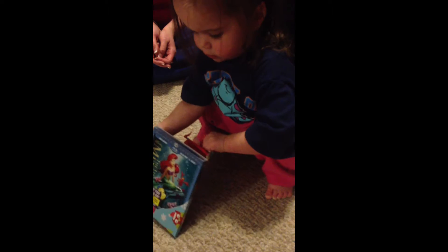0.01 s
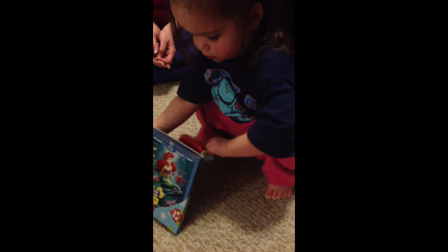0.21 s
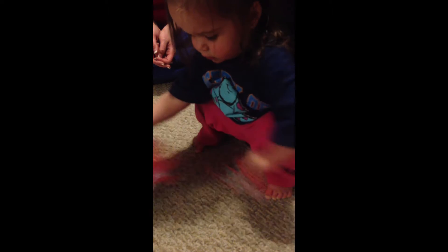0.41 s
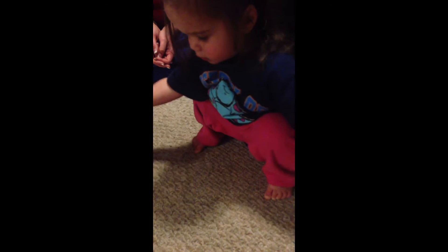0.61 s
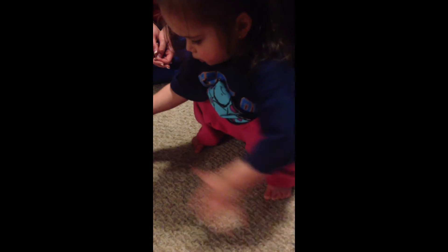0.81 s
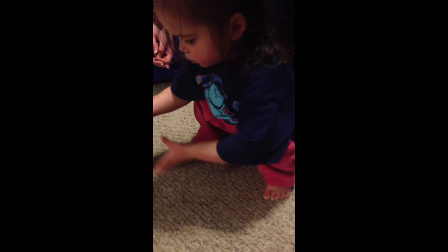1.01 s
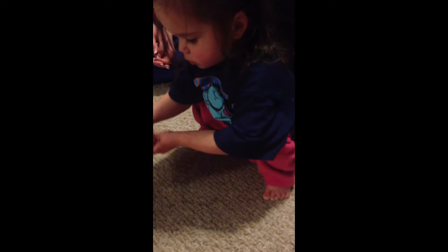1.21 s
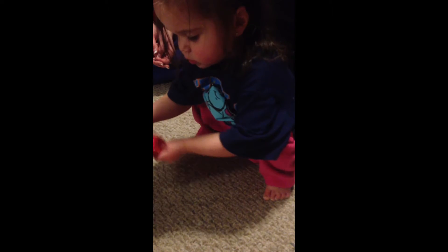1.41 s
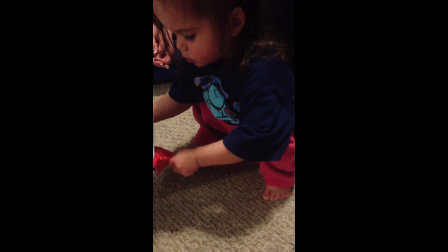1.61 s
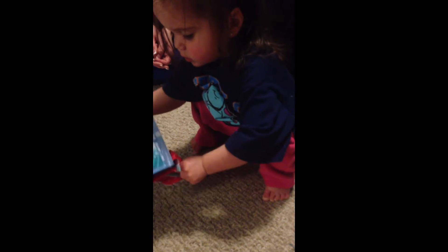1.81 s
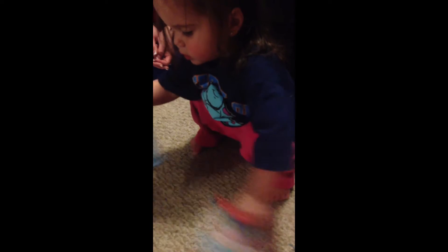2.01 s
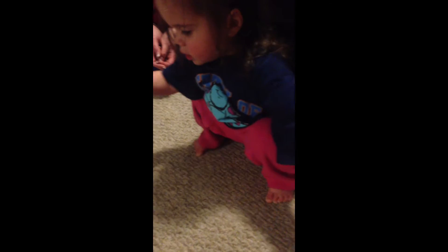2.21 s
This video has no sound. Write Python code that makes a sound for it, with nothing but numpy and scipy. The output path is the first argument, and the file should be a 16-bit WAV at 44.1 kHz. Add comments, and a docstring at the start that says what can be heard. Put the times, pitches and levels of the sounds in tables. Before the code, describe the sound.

Wrapping paper ripped from a cardboard box: one crackly tear, faint flap rustle and a near-quiet gap, small crinkles, then two close rips with dull box knocks; close microphone, soft carpeted room, faint hum.

```python
"""Wrapping paper is pulled off a boxed present: one short rip, loose crinkles, then two more rips close together.
Each pull is a rain of noise grains and louder single creases, coloured as crack, sheet and cardboard box.
Fibre hiss swells with the rips and sine knocks of the box join them; after the first rip a loose flap
rustles in narrow treble noise. Crinkles and a few dull knocks end it. Throughout, a furnished room
answers the paper with sparse reflections, over wavering hum tones and smooth room tone."""
import sys
import numpy as np
from scipy import signal
from scipy.fft import rfft, irfft
from scipy.io import wavfile
from scipy.ndimage import uniform_filter1d

SR = 44100
rng = np.random.default_rng(int(sys.argv[2]) if len(sys.argv) > 2 else 0)


def store_wav(level_fs):
    """Save 16-bit WAV to argv[1]."""
    pcm = np.round(np.clip(np.atleast_2d(level_fs), -1, 1) * 32767)
    wavfile.write(sys.argv[1], SR, pcm.T.astype(np.int16))


def undo_db(level):
    """Turn decibels back into plain size, where 20 dB means ten times bigger."""
    steps = np.asarray(level, float) / 20
    return 10 ** steps


N = 99225  # length in samples, 2.25 s


def evened(x):
    """Scales to rms 1."""
    return x / np.sqrt(np.mean(x ** 2) + 1e-20)


def read(points, hz):
    """Reads a table of (Hz, value) on a log-frequency axis."""
    table_hz, value = np.transpose(points)
    return np.interp(np.log(hz + 1), np.log(table_hz + 1), value)


def band_noise(low_hz, high_hz, order, noise):
    """Keeps one band of the noise."""
    band = signal.butter(order, [low_hz, high_hz], "band", fs=SR, output="sos")
    return signal.sosfilt(band, noise)


def colour(points):
    """Minimum-phase filter of unit energy with this spectrum: its energy comes early, as in a struck body."""
    hz = abs(np.fft.fftfreq(4096, 1 / SR))
    log_gain = np.log(undo_db(np.maximum(read(points, hz), -80)))  # floor at -80 dB
    phase = -signal.hilbert(log_gain).imag
    taps = np.fft.ifft(np.exp(log_gain + 1j * phase)).real[:2048]
    return taps / np.linalg.norm(taps)


def burst(noise, t60):
    """A fast rise, then a decay by 60 dB in t60 seconds."""
    rise_s = 0.00044
    t = np.arange(noise.shape[-1]) / SR
    return noise * (1 - np.exp(-t / rise_s)) * undo_db(-60 * t / t60)


def pitched(noise):
    """Gives each grain its own uneven colour, as patches of paper differ in size."""
    depth_db = 5.5  # most lift or sink
    bins = noise.shape[1] // 2 + 1
    uneven = uniform_filter1d(rng.standard_normal((len(noise), bins)), size=25, axis=1)
    return irfft(rfft(noise) * undo_db(depth_db * np.tanh(evened(uneven))), noise.shape[1])


def crumpled(x):
    """The sheet's colour wanders as it crumples: random patches, some 700 Hz by 17 ms, lift and sink it."""
    patch_db = 2.5  # rms
    z = signal.stft(x, nperseg=256, noverlap=192)[2]
    patches = uniform_filter1d(rng.standard_normal(z.shape), size=4, axis=0)
    patches = uniform_filter1d(patches, size=12, axis=1)
    wandering = z * undo_db(patch_db * evened(patches))
    return evened(signal.istft(wandering, nperseg=256, noverlap=192)[1][:N])


# Colour of a crease's crack, with the microphone's treble peak. Each row: frequency in Hz, relative level in dB.
CRACK_COLOUR = [(3060, -39.5), (5200, -11), (6040, -6), (6770, 0), (6950, 2), (7580, -5.5), (9220, -22),
                (12400, -37), (15400, -51)]
# Colour of the flexing sheet. Each row: frequency in Hz, relative level in dB.
SHEET_COLOUR = [(710, -36), (1200, -4), (1300, -11.5), (1440, -5), (1650, -6), (1990, -0.5), (2640, 0),
                (4020, -4), (4640, -3), (5400, -6.5), (7020, -34), (11900, -120)]
# Colour of the cardboard box. Each row: frequency in Hz, relative level in dB.
BOX_COLOUR = [(82, -27.5), (140, -14), (167, -12), (318, -5), (362, -7.5), (493, -2.5), (578, -3),
              (1300, -17), (1690, -35.5), (2860, -120)]
# Handling of the paper, grouped by pull. Each row: time in seconds, pull strength in dB,
# how hard the sheet shakes the box in dB relative to the crack; values glide from row to row.
PULLS = [
    [(0.0, -98, 10), (0.034, -53.5, -21), (0.072, -76, 3), (0.156, -62, 1)],
    [(0.19, -64, -12), (0.2, -50.5, 1), (0.218, -51.5, -8), (0.243, -38, -16), (0.249, -33.5, -12.5),
     (0.3, -30.5, -11)],
    [(0.3, -31, -2.5), (0.358, -28, -13), (0.392, -42, -11.5), (0.46, -64.5, -2)],
    [(0.46, -65, 6), (0.598, -65.5, -10), (0.606, -69, 5.5), (1.05, -82.5, -4), (1.1, -66, -11)],
    [(1.198, -71, 12), (1.224, -52, -16.5), (1.278, -75.5, 5.5), (1.4, -63.5, 0)],
    [(1.4, -59, 1), (1.462, -67.5, 5), (1.488, -47, -6), (1.522, -68, 1.5), (1.657, -65.5, 10.5)],
    [(1.659, -40, -0.5), (1.704, -49, -10), (1.711, -34.5, -13.5), (1.737, -39, -7.5), (1.78, -46, -10.5),
     (1.79, -59.5, -2), (1.85, -59.5, 2)],
    [(1.855, -44, -30), (1.861, -36, -15), (1.905, -28.5, -6), (1.958, -51, -5)],
    [(1.96, -33.5, -19), (1.978, -39.5, -13.5), (2.016, -54.5, -14), (2.038, -57, -5), (2.25, -79, 15)],
]


def crackle():
    """A dense rain of tiny snaps of uneven size, heard as crack, flexing sheet and shaken box."""
    trim_db, snaps_per_s, spread_db, hiss_share = -3, 2400, 3, 0.2
    crack_t60, sheet_t60, box_t60 = 0.010, 0.018, 0.04  # s
    count = 20  # different grain shapes
    s, strength_db, shake_db = np.concatenate(PULLS).T
    t = np.arange(N) / SR
    level_db = np.interp(t, s, strength_db) + trim_db
    box_db = np.interp(t, s, shake_db)
    sheet_db = -3.5 + 0.3 * (box_db + 12)  # the sheet flexes more as the box is shaken

    size = undo_db(spread_db * np.minimum(rng.exponential(1, N), 3))
    size = size * (rng.random(N) < snaps_per_s / SR)
    shape_number = rng.integers(0, count, N)

    out = np.zeros(N)
    for t60, part_db, body in [(crack_t60, 0, CRACK_COLOUR), (sheet_t60, sheet_db, SHEET_COLOUR),
                               (box_t60, box_db, BOX_COLOUR)]:
        shapes = burst(pitched(rng.standard_normal((count, 1500))), t60)
        grains = sum(signal.oaconvolve(size * (shape_number == k), shapes[k])[:N] for k in range(count))
        rain = (1 - hiss_share) * evened(grains) + hiss_share * rng.standard_normal(N)
        part = undo_db(level_db + part_db) * crumpled(rain)
        out += signal.oaconvolve(part, colour(body))[:N]
    return out


# Single creases snapping. Each row: start in seconds, level in dB,
# flex of sheet and box in dB relative to that level, ring frequency in Hz.
CREASES = [(0.03, -33.5, -7, 7500), (0.147, -39, -28, 6510), (0.1502, -31.5, -8.5, 4000),
           (0.198, -39, -5, 4260), (0.201, -37, -8, 3420), (0.2116, -41.5, 8, 2570),
           (0.232, -21.5, -8.5, 2710), (0.2338, -30.5, 6, 4320), (0.2446, -30.5, 4, 4500),
           (0.248, -29.5, 4, 4830), (0.2559, -26, 7, 2460), (0.26, -31, 6, 2540), (0.2751, -21.5, -4, 3330),
           (0.2807, -27, 3.5, 4800), (0.2883, -34, 6, 3370), (0.3229, -31, -16, 3770),
           (0.3349, -18, -7, 3400), (0.3466, -28, -18, 2040), (0.3493, -28, 4, 5330),
           (0.3543, -16.5, -6.5, 4380), (0.358, -19, -8, 4300), (0.3623, -24, -16, 4460),
           (0.4044, -48, 3, 2540), (0.436, -43, -3, 2260), (0.495, -50, -5, 2100), (0.679, -52, 0, 1670),
           (0.7167, -53.5, -5, 2490), (1.134, -50.5, 10, 5280), (1.1574, -53, 7.5, 2540),
           (1.1631, -45.5, 0.5, 1780), (1.202, -51, -3, 2560), (1.2253, -34.5, -6.5, 5350),
           (1.25, -48, -3, 1710), (1.3376, -54, -6, 5000), (1.372, -48.5, 4.5, 1820),
           (1.3851, -42.5, -1.5, 1820), (1.411, -40.5, -8, 2640), (1.432, -48, -3, 6900),
           (1.465, -51, 4, 2800), (1.48, -33, -3, 2700), (1.4893, -34, -9.5, 5200),
           (1.5888, -47.5, 12, 2520), (1.6025, -46.5, 14, 1910), (1.6174, -55, 17.5, 2570),
           (1.6595, -24.5, -1.5, 7300), (1.6625, -23, -10, 1900), (1.6687, -35, -6, 2000),
           (1.6774, -27.5, -4, 5340), (1.6885, -25.5, -7, 4600), (1.7098, -29, 3.5, 5200),
           (1.7292, -25.5, 0.5, 1980), (1.7333, -28, 5, 2660), (1.7363, -29, -5, 1910),
           (1.7502, -26.5, -1.5, 3570), (1.7715, -30.5, -7, 3630), (1.8137, -43, -12, 3730),
           (1.834, -45, -3, 2530), (1.855, -33, -2, 5200), (1.862, -29, -25, 6800),
           (1.877, -35.5, 5.5, 1990), (1.8924, -21.5, -2.5, 1960), (1.8944, -24, -6, 3030),
           (1.9052, -24.5, 2, 2670), (1.918, -30.5, 8, 2660), (1.9352, -29, -17, 1960),
           (1.9425, -29, -5, 5170), (1.9617, -28, -1, 2220), (1.9684, -27.5, 0, 1920),
           (1.9799, -27, -2, 2140), (1.9985, -38, 0, 2700), (2.039, -45, 0.5, 1850),
           (2.0665, -44, -5, 2850), (2.0916, -42, -2, 1750), (2.145, -57, -11, 1850),
           (2.16, -55, 13.5, 1834)]


def snaps():
    """Each crease gives a short crack, a flex of sheet and box and a brief ring of the buckled patch."""
    ring_db, ring_cycles = -7, 50  # ring level relative to the flex, cycles to fall 60 dB
    part_t60 = [0.007, 0.011, 0.022]  # crack, sheet, box (s)
    part_db = [-0.5, -5, -16.5]  # crack, sheet, box
    bodies = [colour(c)[:1000] for c in (CRACK_COLOUR, SHEET_COLOUR, BOX_COLOUR)]
    t = np.arange(1500) / SR
    out = np.zeros(N + 1500)
    for s, db, flex_db, hz in CREASES:
        grains = pitched(rng.standard_normal((3, 1500)))
        ring = burst(np.sin(2 * np.pi * hz * t), ring_cycles / hz)
        snap = undo_db(flex_db + ring_db) * ring
        for k, extra_db in enumerate([0, flex_db, flex_db]):
            part = signal.fftconvolve(burst(grains[k], part_t60[k]), bodies[k])[:1500]
            snap = snap + undo_db(extra_db + part_db[k]) * part / abs(part).max()
        out[round(s * SR):][:1500] += undo_db(db) * snap
    return out[:N]


def fibres():
    """Airy hiss of tearing fibres; its level grows faster than the pull, so hard pulls bring it out."""
    level_at_30_db, growth = -56.5, 1.6  # dB at a pull strength of -30 dB, dB per dB of pull
    s, strength_db, _ = np.concatenate(PULLS).T
    strength = np.interp(np.arange(N) / SR, s, strength_db)
    hiss = band_noise(8750, 14000, 3, rng.standard_normal(N))
    return undo_db(level_at_30_db + growth * (strength + 30)) * evened(hiss)


# Knocks of the box against hands and carpet. Each row: start in seconds, level before decay in dB, frequency in Hz.
KNOCKS = [(.2110, -27.5, 614), (.322, -32, 583), (0.327, -51, 313), (0.31, -39, 172), (.361, -25, 470),
          (.404, -34.5, 470), (1.527, -42.5, 940), (1.665, -32.5, 606), (1.710, -30, 700),
          (1.7275, -18, 616), (1.894, -28.5, 524), (1.906, -23.5, 498), (1.91, -38, 157), (1.913, -25, 970),
          (2.145, -42, 715), (2.152, -34, 188), (2.195, -39, 217)]


def knocks():
    """Dull decaying sines with a soft start; lower ones ring longer."""
    decay_cycles = 10.1  # cycles to fall 60 dB
    t = np.arange(8000) / SR
    out = np.zeros(N + 8000)
    for s, db, hz in KNOCKS:
        envelope = undo_db(db - 60 * t * hz / decay_cycles) * (1 - np.exp(-t * hz))
        out[round(s * SR):][:8000] += envelope * np.sin(2 * np.pi * hz * t)
    return out[:N]


# A loose flap rustles far from the box, only its treble heard. Each row: start in seconds, peak in dB, length in seconds.
FLAP = [(.5485, -58, 0.0028), (0.561, -52, .003), (.566, -42.5, .006), (0.575, -49, 0.0044),
        (0.585, -50, .004), (0.594, -57, .0025)]


def rustles():
    """Soft puffs of narrow treble noise, each swelling and sinking once."""
    centre_hz, width_hz = 6980, 860
    t = np.arange(600) / SR
    out = np.zeros(N)
    for s, db, length in FLAP:
        noise = rng.standard_normal(1200)
        noise = band_noise(centre_hz - width_hz / 2, centre_hz + width_hz / 2, 2, noise)[600:]  # settled part
        swell = np.sqrt(np.sin(np.pi * np.clip(t / length, 0, 1)).clip(0))
        puff = noise * swell
        out[round(s * SR):][:600] += undo_db(db) * puff / abs(puff).max()
    return out


# Decay of the room. Each row: frequency in Hz, time to fall 60 dB in seconds.
ROOM_DECAY = [(300, 0.099), (2000, 0.23), (7000, 0.11), (12000, 0.26)]


def room(x):
    """A soft furnished room: sparse reflections, each band dying at its own speed."""
    taps = np.zeros(SR // 2)
    slots = np.arange(100, SR // 2 - 20, 20)  # one reflection in every 20 samples
    taps[slots + rng.integers(0, 20, len(slots))] = rng.choice([-1., 1.], len(slots))
    hz, t, z = signal.stft(taps, SR, nperseg=256)
    decay = undo_db(-60 * t / read(ROOM_DECAY, hz)[:, None])
    tail = signal.istft(z * decay, SR, nperseg=256)[1]
    return signal.fftconvolve(x, tail / np.linalg.norm(tail))[:N]


# Appliance hum. Each row: frequency in Hz, level in dB,
# unsteadiness (each unit gives 0.361 Hz rms of pitch and 0.12 dB rms of level).
HUM_TONES = [(118.3, -61, 1.5), (163.2, -63.5, 4.74), (238, -81, 2.9), (321, -69, 8.04), (398, -72, 4.27)]


def slow_drift():
    """Noise smoothed twice by a one-pole low-pass at 3 Hz, rms 1."""
    pole = np.exp(-np.pi * 6 / SR)
    once = signal.lfilter([1], [1, -pole], rng.standard_normal(N))
    return evened(signal.lfilter([1], [1, -pole], once))


def hum():
    """Steady low tones that waver in pitch and strength."""
    out = np.zeros(N)
    for hz, db, unsteady in HUM_TONES:
        level = undo_db(db + 0.12 * unsteady * slow_drift())
        phase = 2 * np.pi * np.cumsum(hz + 0.361 * unsteady * slow_drift()) / SR
        out += level * np.sqrt(2) * np.sin(phase)  # root 2 makes the level an rms
    return out


# Colour of room tone and microphone hiss. Each row: frequency in Hz, relative level in dB.
AIR_COLOUR = [(15, -51.5), (25, -30), (64, -18), (91, -12), (129, -4.5), (209, -6), (409, -10.5),
              (468, -16), (780, -25), (1840, -30), (2220, -24), (3910, -27.5), (15400, -32)]


def air():
    """Smooth room tone: steady noise shaped by its spectrum."""
    level_db = -60.5  # rms
    gain = undo_db(read(AIR_COLOUR, np.fft.rfftfreq(N, 1 / SR)))
    return undo_db(level_db) * evened(irfft(rfft(rng.standard_normal(N)) * gain, N))


def scene():
    """Paper and box in the room, over hum and room tone."""
    room_db = -14.5
    paper = crackle() + snaps() + fibres() + knocks() + rustles()
    low_cut = signal.butter(2, 130, "high", fs=SR, output="sos")
    paper = signal.sosfilt(low_cut, paper)
    return (paper + undo_db(room_db) * room(paper) + hum() + air())[None]


def low_pass(x):
    """Removes everything above the highest recorded frequency."""
    return signal.sosfilt(signal.butter(12, 15620, fs=SR, output="sos"), x)


def record(dry):
    """Delivers the finished mix."""
    return low_pass(dry)


dry = scene()
out = record(dry)
store_wav(out)
```